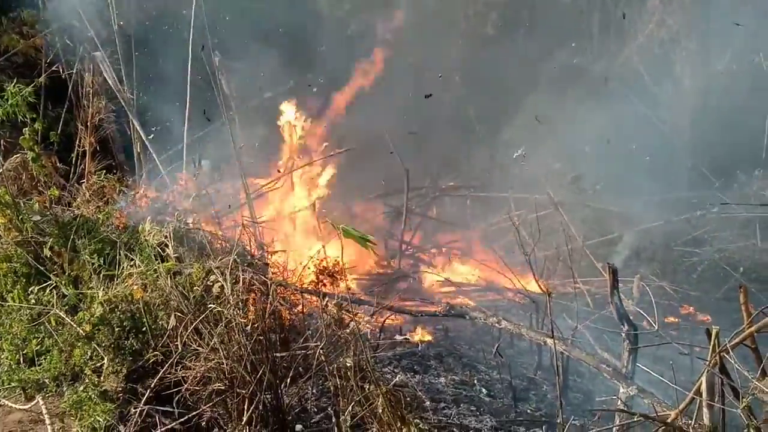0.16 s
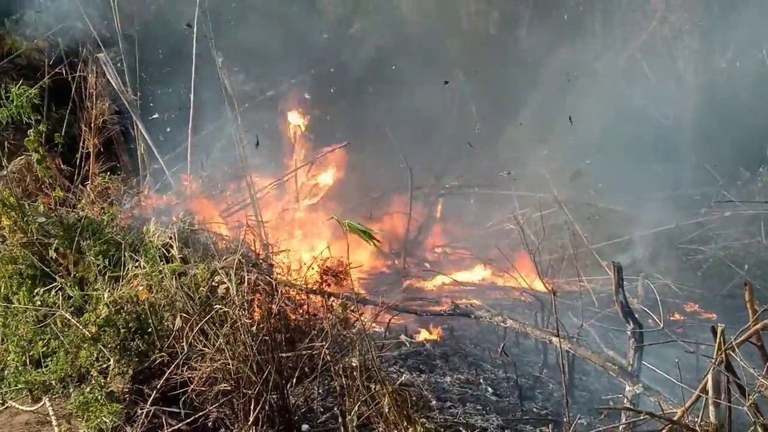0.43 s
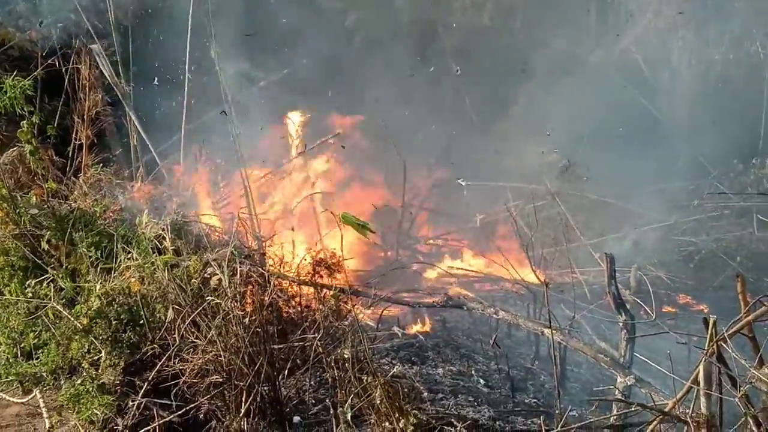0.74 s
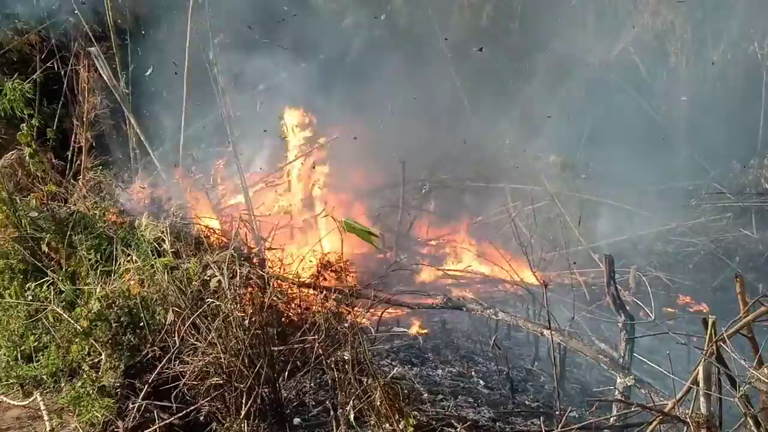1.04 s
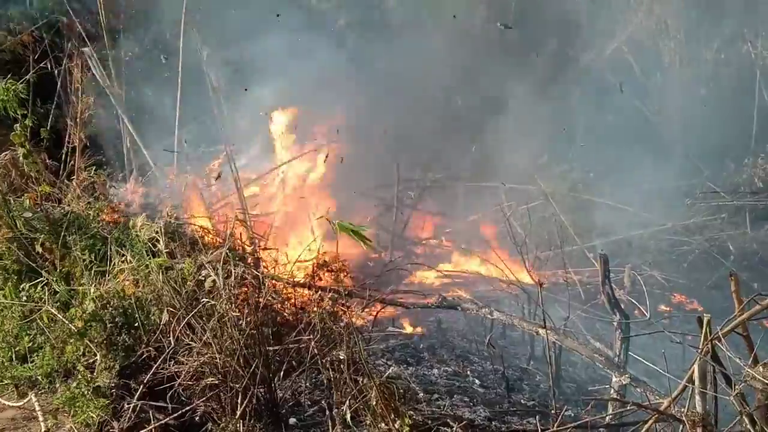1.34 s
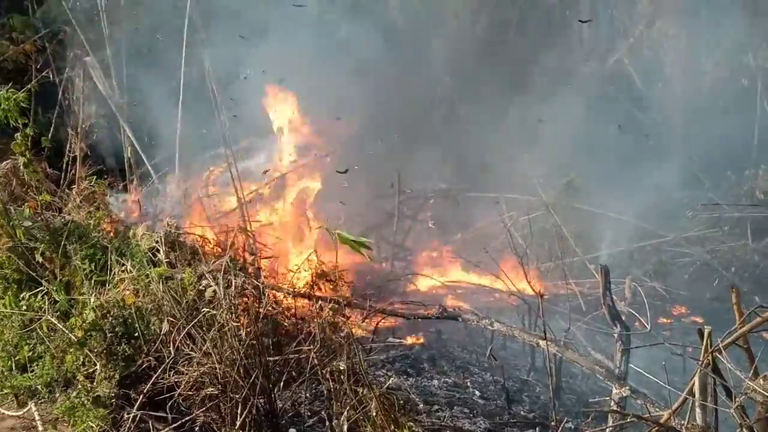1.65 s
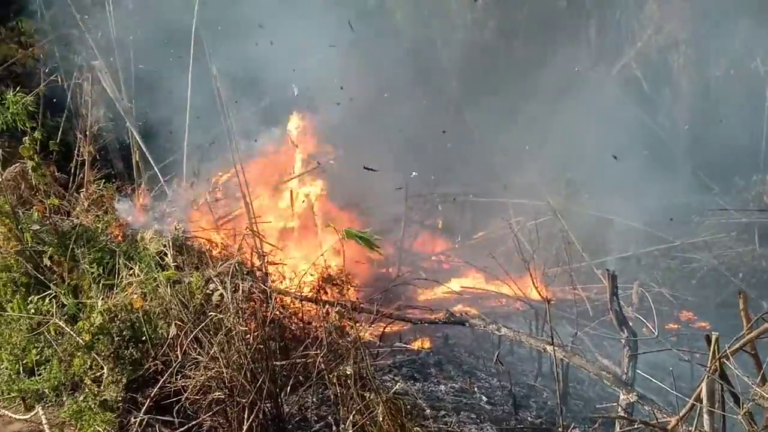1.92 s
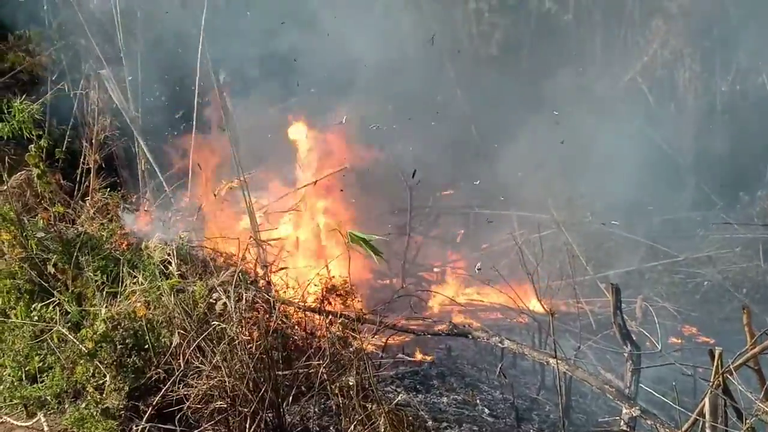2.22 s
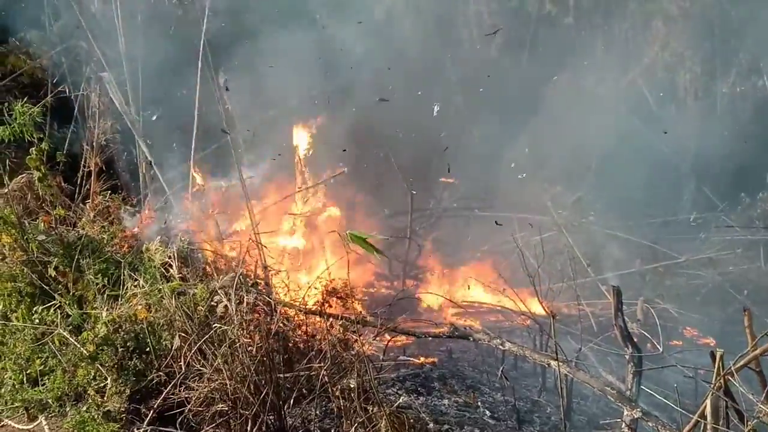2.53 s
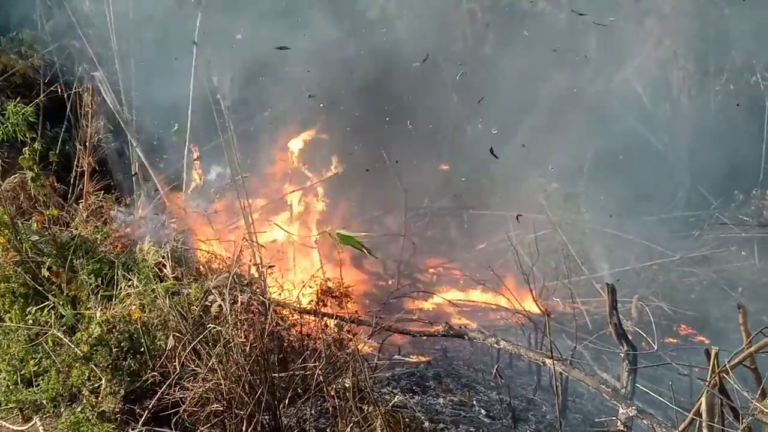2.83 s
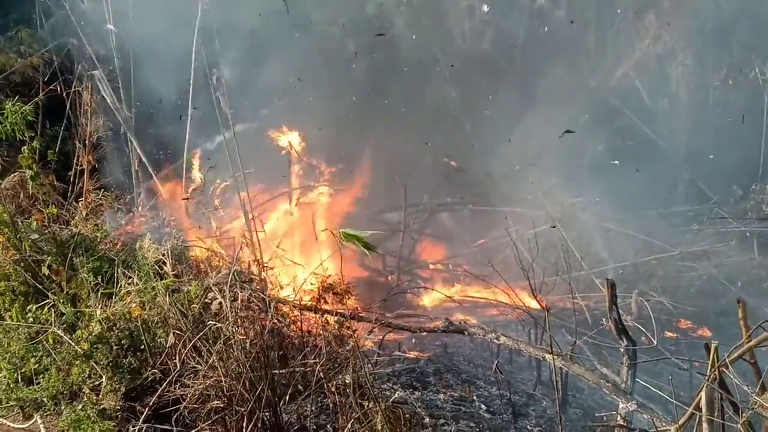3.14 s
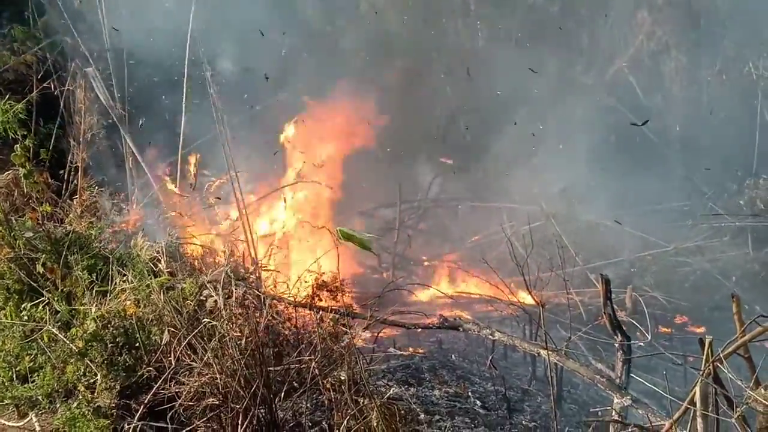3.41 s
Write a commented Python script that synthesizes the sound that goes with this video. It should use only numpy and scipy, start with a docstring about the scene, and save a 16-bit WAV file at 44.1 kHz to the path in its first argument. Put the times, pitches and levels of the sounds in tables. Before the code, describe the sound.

A brush fire crackles outdoors, a few metres away, in mono. It opens with a flare and dense leaf crackle over low rumble and faint hiss. Loud stem bursts hit near 0.27, 0.5, 1.0, 1.5 and 1.8 seconds, deep thumps mixed with sharp cracks and brief diffuse tails. Twigs tick between. After 2 seconds pops are smaller and sparser, with another flame swell around 3.4.

```python
"""A brush fire on an open hillside, heard from some metres away.
Throughout, flames rumble and burning leaves crackle and hiss: shaped noise whose level jumps at random snaps.
From the start flames also flare up, as swells of band noise, and twigs tick, as short decaying noise bursts.
From about a quarter second hollow stems burst: a bang and a puff of steam ring a cavity, and the brush
scatters each pop into a tail. A look-ahead limiter ducks the loudest peaks."""
import sys
import numpy as np
from scipy import signal
from scipy.fft import rfft, irfft, next_fast_len
from scipy.io import wavfile
from scipy.ndimage import uniform_filter1d, minimum_filter1d, map_coordinates

SR = 44100
rng = np.random.default_rng(int(sys.argv[2]) if len(sys.argv) > 2 else 0)


def generate_wav(sig):
    """Save sig (samples, or channels by samples) to the path in sys.argv[1] as 16-bit PCM at SR."""
    pcm = np.round(np.clip(np.atleast_2d(sig).T, -1, 1) * 32767).astype(np.int16)
    wavfile.write(sys.argv[1], SR, pcm)


N = 157437  # samples in the scene

# Spectra of the rumble, low crackle, bright crackle and hiss. Each row: frequency in Hz, relative density in dB.
RUMBLE_SPECTRUM = [(25, -73), (45, -7), (70, 2.5), (120, 4), (200, 1), (300, -10), (500, -28), (900, -59)]
LOW_SPECTRUM = [(120, -28), (250, -5.5), (400, -3.5), (800, -6), (1300, -9), (2500, -61)]
BRIGHT_SPECTRUM = [(400, -55), (900, -6.5), (1300, -4), (2200, 0), (3000, -7.5), (4100, -12.5), (5400, -33),
                   (7000, -98)]
HISS_SPECTRUM = [(3000, -1.5), (5000, -7.5), (8200, 1), (9300, -1.5), (10500, -16.5), (12500, -22),
                 (15500, -20)]
# Spectrum of a twig's tick. Each row: frequency in Hz, relative density in dB.
TICK_SPECTRUM = [(3500, 17.5), (5500, -1.5), (9000, 0), (11000, -14)]
# Response of air and microphone, applied to flares and pops. Each row: frequency in Hz, gain in dB.
PATH_RESPONSE = [(40, 5), (80, 12), (2200, 1), (3000, -1), (4100, -3), (5500, -19), (9200, -20),
                 (10500, -31), (15500, -75.5)]
# Course of the flame rumble. Each row: time in seconds, level in dB.
RUMBLE_COURSE = [(0, -25), (.4, -24.5), (.6, -20), (.95, -27), (1.12, -18.5), (1.3, -29), (1.7, -27.5),
                 (2.2, -24.5), (2.8, -27.5), (3.3, -23), (3.57, -23)]
# Course of the burning leaves. Each row: time in seconds, low crackle in dB, bright crackle in dB.
LEAF_COURSE = [(0, -16.5, -19), (.24, -28, -28.5), (.7, -22.5, -24), (.97, -27, -34), (1.2, -22, -28),
               (1.52, -31.5, -36), (1.7, -30, -27.5), (1.9, -41.5, -31), (2.13, -50, -35),
               (2.2, -22, -28.5), (2.5, -31, -27.5), (2.8, -34.5, -36.5), (3.05, -29, -35),
               (3.24, -24, -33), (3.57, -32.5, -33)]
# Flames flaring up. Each row: time of the summit in seconds, level there in dB before the grit,
# band centre in Hz before the path, standard deviation of the swell in seconds.
FLARE_EVENTS = [(0.02, -17.5, 1150, 0.13), (1.265, -23.5, 2300, 0.086), (1.473, -21, 156, 0.032),
                (2.094, -20.5, 183, 0.063), (2.406, -22, 1510, 0.062), (3.386, -18, 1465, 0.084),
                (3.43, -22, 76.4, 0.12)]
# Twigs ticking. Each row: start in seconds, rms at the start in dB, rms of the top edge at the start in dB.
TWIG_EVENTS = [(0.0074, -17.5, -50), (0.2244, -35, -56), (0.273, -19, -45), (0.451, -24.5, -51),
               (0.7796, -47, -53), (0.822, -18, -47), (1.125, -26.5, -50), (1.5215, -17.5, -47),
               (1.666, -27, -57), (1.7424, -32, -52), (1.8165, -25, -48), (2.356, -19.5, -45.5),
               (2.4885, -34, -50), (2.6936, -25.5, -42), (3.0435, -38, -55), (3.0838, -21, -42),
               (3.303, -23.5, -46)]
# Stems bursting. Each row: start in seconds, peak of the direct pop in dB, cavity resonance in Hz,
# length in seconds, scatter in dB relative to that peak.
STEM_EVENTS = [(0.271, 8.5, 333, 0.0052, -24.5), (0.506, 4, 453, 0.0082, -22.5),
               (0.625, -2, 550, 0.006, -33), (0.652, -12, 355, 0.0048, -21),
               (0.78, -4, 2240, 0.0071, -15.5), (.908, -1, 590, 0.008, -24.5),
               (1.004, 7.5, 766, 0.01, -28.5), (1.122, -1.5, 2500, 0.0083, -16.5),
               (1.145, -3, 650, 0.024, -22), (1.194, -7, 620, 0.0083, -13.5),
               (1.521, 5.5, 1520, 0.00015, -37), (1.575, -7.5, 860, 0.02, -20), (1.582, 3, 666, .002, -42),
               (1.735, -7.5, 2300, 0.01, -16.5), (1.816, 8.5, 2180, 0.0039, -30),
               (2.143, -2.5, 1140, 0.012, -11), (2.184, -7, 1210, 0.0078, -31),
               (2.223, -6, 286, 0.0079, -17.5), (2.353, -5, 1720, 0.013, -13.5),
               (2.485, -7, 1930, 0.0093, -16.5), (2.866, -11, 1660, 0.0099, -19),
               (2.923, -9.5, 330, 0.026, -13), (3.073, -2.5, 660, 0.011, -14.5),
               (3.178, -10.5, 426, 0.0058, -13), (3.202, -6, 397, 0.008, -16),
               (3.3, -6, 1830, 0.0094, -10.5), (3.545, -11.5, 1520, 0.0098, -8)]

HISS_DB, HISS_FOLLOWS = -53, 0.36  # mean level; dB of hiss per dB of bright crackle
FLARE_WIDTH, SIZZLE_DB = 0.9, -8  # band width over centre frequency; broad skirt of the band
TICK_T60_S = 0.08
EDGE_HZ, EDGE_T60_S = 7800, 0.033  # the top edge dies sooner
POP_WIDTH = 1.14  # resonance width over its frequency
RISE, FALL = 0.3, 0.6  # swell before the bang and decay constant after the puff, both over its length
BANG_DB, CRACK_DB = 24, -21  # one-sample bang in the puff; broad crack beside the ring
SPLIT_RATIO, SPLIT_DB = 1.91, -8  # as the stem splits, a higher ring follows
SCATTER_HZ, SCATTER_WIDTH_HZ = 1746, 740
SCATTER_T60_S, SCATTER_ONSET_S = 0.33, 0.0038
NEAR_DB, NEAR_T60_S = 24, 0.02  # the nearest brush answers louder and shorter
LIMIT_DB, LOOK_AHEAD_S, GLIDE_S = -0.5, 0.024, 0.006
TOP_HZ = 15700


def amp(db):
    """Decibel law: 20 dB is a tenfold amplitude."""
    return 10 ** (np.asarray(db) / 20)


def unit(x):
    """Normalization to unit root mean square."""
    return x / np.sqrt(np.mean(x ** 2) + 1e-20)


def gain(points, hz):
    """Spectral envelope: dB interpolated linearly over log frequency, as amplitude."""
    f, db = np.transpose(points)
    return amp(np.interp(np.log(hz + 1), np.log(f + 1), db))


def along(rows):
    """Linear interpolation in time: one curve for each column after the time."""
    s, *columns = np.transpose(rows)
    return [np.interp(np.arange(N) / SR, s, column) for column in columns]


def wobble(rate):
    """Slow fluctuation: a smooth spline through random knots, rate of them a second."""
    return map_coordinates(rng.standard_normal(300), [np.arange(N) * rate / SR])


def filtered(x, response):
    """Linear filtering: the spectrum is multiplied by a response of frequency."""
    m = next_fast_len(len(x) + 4096)
    hz = np.fft.rfftfreq(m, 1 / SR)
    return irfft(rfft(x, m) * response(hz), m)[:len(x)]


def causal(points):
    """Minimum phase: folding the cepstrum makes the impulse response of an envelope causal."""
    cepstrum = irfft(np.log(gain(points, np.fft.rfftfreq(4096, 1 / SR))))
    cepstrum[1:2048] *= 2
    cepstrum[2049:] = 0
    return irfft(np.exp(rfft(cepstrum)))[:2048]


def band(hz, width_hz):
    """Damped resonance: the band-pass response of a second-order oscillator."""
    return lambda f: 1j * f * width_hz / (hz * hz - f * f + 1j * f * width_hz)


def crackle(spectrum, per_s, spread_db, life_s, grain_db, patchy_db):
    """Shot noise: random snaps raise the level of patchy noise, which dies back exponentially."""
    _, _, cells = signal.stft(rng.standard_normal(N), SR, nperseg=512)
    patches = uniform_filter1d(rng.standard_normal(cells.shape), size=6, axis=0)  # over frequency
    patches = uniform_filter1d(patches, size=12, axis=1)  # over time
    noise = signal.istft(cells * amp(patchy_db * unit(patches)), SR, nperseg=512)[1][:N]
    when, size = rng.random(N), rng.exponential(size=N)
    snaps = (when < per_s / SR) * amp(spread_db * np.minimum(size, 3))
    jumps = signal.lfilter([1], [1, -np.exp(-1 / (life_s * SR))], snaps)
    grainy = noise * (1 + amp(grain_db) * jumps)
    return unit(filtered(grainy, lambda f: gain(spectrum, f)))


def flames():
    """Superposition of independent noise sources: a lumpy rumble, two crackles of leaves and their hiss."""
    rumble_db, = along(RUMBLE_COURSE)
    low_db, bright_db = along(LEAF_COURSE)
    hiss_db = HISS_DB + HISS_FOLLOWS * (bright_db - bright_db.mean())
    lumps_db = 1.4 * np.tanh(wobble(16))
    rumble = crackle(RUMBLE_SPECTRUM, per_s=40, spread_db=2, life_s=0.01, grain_db=-8, patchy_db=1.5)
    low = crackle(LOW_SPECTRUM, per_s=90, spread_db=3, life_s=0.004, grain_db=-3, patchy_db=2.2)
    bright = crackle(BRIGHT_SPECTRUM, per_s=400, spread_db=3, life_s=0.001, grain_db=0, patchy_db=2.5)
    hiss = crackle(HISS_SPECTRUM, per_s=40, spread_db=3, life_s=0.008, grain_db=-4, patchy_db=2.5)
    leaves = amp(low_db) * low + amp(bright_db) * bright + amp(hiss_db) * hiss
    return amp(rumble_db + lumps_db) * rumble + leaves


def flares():
    """Amplitude modulation: Gaussian swells of broad-band noise, roughened by a fast fluctuation."""
    t, out = np.arange(N) / SR, np.zeros(N)
    grit = amp(2 * wobble(80))
    for summit, db, hz, spread in FLARE_EVENTS:
        ring = band(hz, FLARE_WIDTH * hz)
        noise = filtered(rng.standard_normal(N),
                         lambda f: (ring(f) ** 2 + amp(SIZZLE_DB) * ring(f)) * gain(PATH_RESPONSE, f))
        swell = np.exp(-((t - summit) / spread) ** 2 / 2)
        out += amp(db) * swell * unit(noise) * grit
    return out


def twigs():
    """Exponential decay: abrupt bright noise bursts with a thin top edge that dies sooner."""
    t, level, edge = np.arange(N) / SR, np.zeros(N), np.zeros(N)
    for s, db, edge_db in TWIG_EVENTS:
        age = np.abs(t - s)  # abs keeps the unused part before the start finite
        level += (t >= s) * amp(db - 60 * age / TICK_T60_S)
        edge += (t >= s) * amp(edge_db - 60 * age / EDGE_T60_S)
    colour = causal(TICK_SPECTRUM)
    colour = colour / np.linalg.norm(colour)
    body = signal.fftconvolve(level * rng.standard_normal(N), colour)[:N]
    top = unit(filtered(rng.standard_normal(N), lambda f: f > EDGE_HZ))
    return body + edge * top


def burst(t, puff_noise, hz, length, path):
    """Cavity resonance: a bang and a puff of steam ring the hollow stem, then a higher ring as it splits."""
    swell = np.minimum(t / (RISE * length), 1)
    decay = np.exp(-np.maximum(t - length, 0) / (FALL * length))
    puff = puff_noise * swell * decay
    puff[round(RISE * length * SR)] = amp(BANG_DB)
    ring, split = band(hz, POP_WIDTH * hz), band(SPLIT_RATIO * hz, POP_WIDTH * hz)
    crack = band(SCATTER_HZ, SCATTER_WIDTH_HZ)
    first = filtered(puff, lambda f: ring(f) ** 2 + amp(CRACK_DB) * crack(f) ** 2)
    second = filtered(puff * np.minimum(t / length, 1), lambda f: split(f) ** 2)
    pop = signal.fftconvolve(first + amp(SPLIT_DB) * second, path)[:len(t)]
    return pop / np.abs(pop).max()


def scatter(t, noise, hz, length):
    """Diffuse scattering: the brush answers with a noise tail of two decays, coloured by cavity and brush."""
    ring, brush = band(hz, POP_WIDTH * hz), band(SCATTER_HZ, SCATTER_WIDTH_HZ)
    tail = unit(filtered(noise, lambda f: (0.5 * ring(f) + brush(f)) * gain(PATH_RESPONSE, f)))
    onset = np.clip((t - length) / SCATTER_ONSET_S, 0, 1)
    decay = amp(-60 * t / SCATTER_T60_S) + amp(NEAR_DB - 60 * t / NEAR_T60_S)
    return tail * onset * decay


def pops():
    """Superposition of direct and scattered sound for every bursting stem."""
    out, t = np.zeros(N + SR), np.arange(SR // 3) / SR
    path = causal(PATH_RESPONSE)
    for s, db, hz, length, scatter_db in STEM_EVENTS:
        a, b = rng.standard_normal((2, len(t)))
        pop = burst(t, a * b * b, hz, length, path)  # the product makes spiky noise
        tail = amp(scatter_db) * scatter(t, b, hz, length)
        out[round(s * SR):][:len(t)] += amp(db) * (pop + tail)
    return out[:N]


def scene():
    """Linear superposition of all sources in one channel."""
    return (flames() + flares() + twigs() + pops())[None]


def record(dry):
    """Look-ahead limiting: gain falls ahead of loud peaks, the rest clips softly, then the band is limited."""
    need = np.minimum(1, amp(LIMIT_DB) / (np.abs(dry[0]) + 1e-9))
    ahead, glide = round(LOOK_AHEAD_S * SR), round(GLIDE_S * SR)
    held = minimum_filter1d(need, ahead + glide, origin=(glide - ahead) // 2)
    x = dry[0] * uniform_filter1d(held, glide)
    x = x / (1 + np.abs(x) ** 8) ** (1 / 8)  # soft clip
    return filtered(x, lambda f: f < TOP_HZ)[None]


dry = scene()
out = record(dry)
generate_wav(out)
```